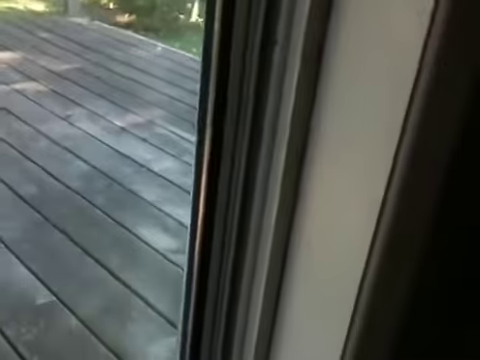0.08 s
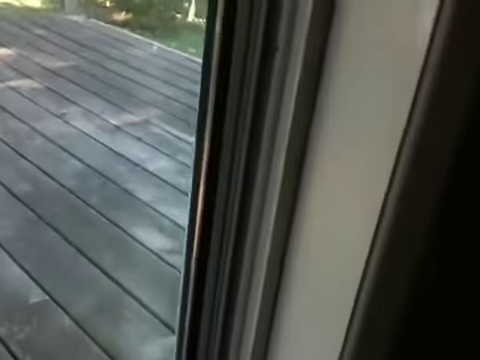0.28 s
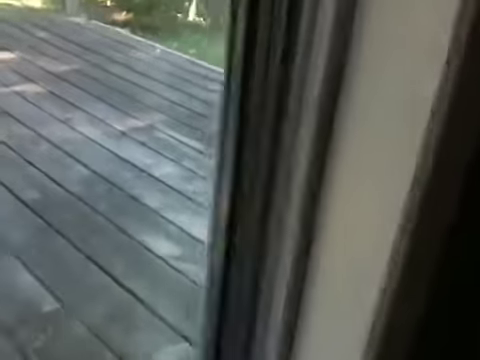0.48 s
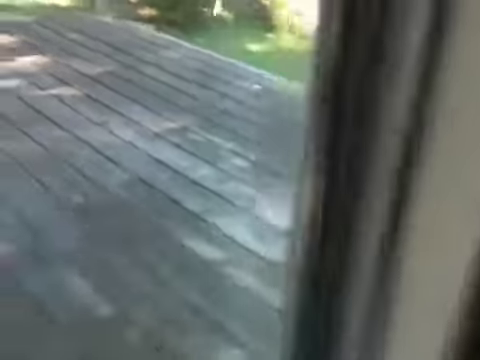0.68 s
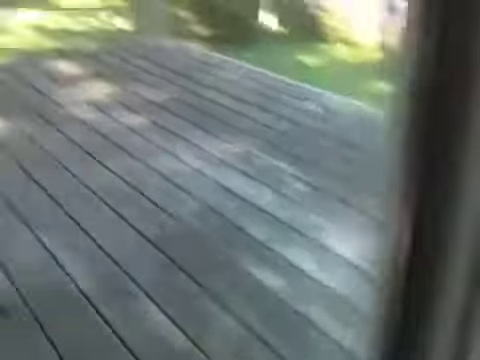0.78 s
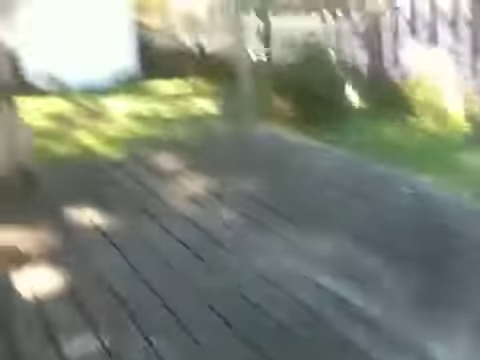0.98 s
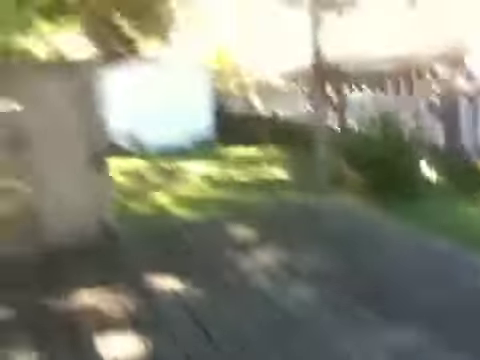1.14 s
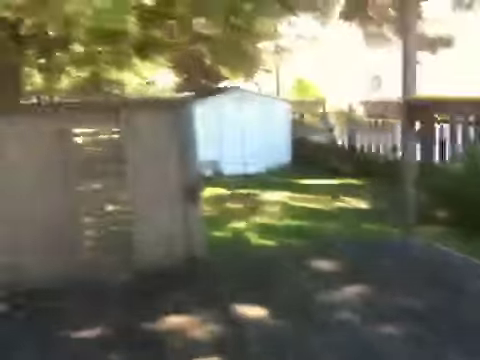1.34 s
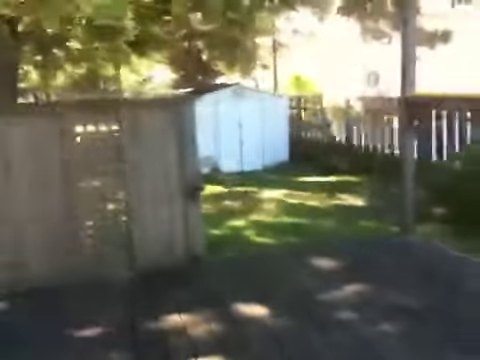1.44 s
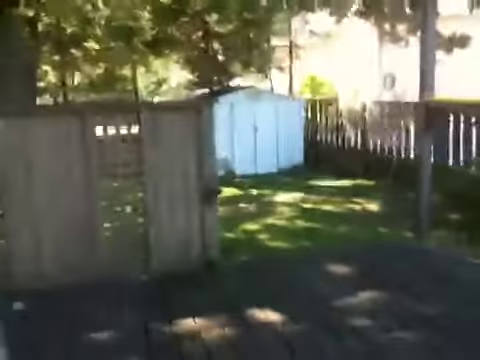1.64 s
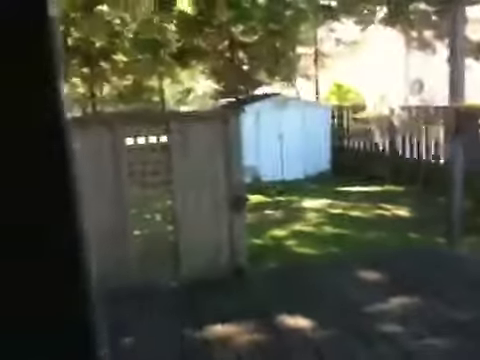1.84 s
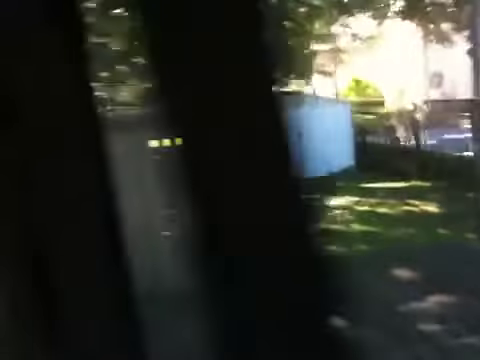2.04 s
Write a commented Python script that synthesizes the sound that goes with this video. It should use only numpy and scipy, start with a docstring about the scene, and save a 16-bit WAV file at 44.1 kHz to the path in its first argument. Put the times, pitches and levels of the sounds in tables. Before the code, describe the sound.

A sliding glass door is unlatched, heard close from indoors. A faint knock opens, then a hard, dry snap at 0.22 s with bolt chatter to 0.35 s and a light tap at 0.41. Metal handle clacks cluster at 0.75-0.97 s. Near quiet follows, with soft low pane thuds and tiny ticks over faint air hiss. At 1.82 s the door knocks free; rollers rumble, with low drone and grit growing from about 1.9 s to the end.

```python
"""A faint knock of a lock on its frame, then a hard snap: a sliding glass door is unlatched, heard from indoors.
The bolt chatters and the metal handle clacks in two clusters: noise cracks and rattles that ring damped modes.
The pulled pane thuds softly in single low resonances; rubs and small ticks are short bursts of band-limited noise.
The door lets go with a knock; its rollers rumble as bumps through door resonances, with a drone and grit hiss.
A faint hiss of air and a short room response lie around it."""
import sys
import numpy as np
from scipy import signal
from scipy.fft import rfft, irfft, next_fast_len
from scipy.io import wavfile
from scipy.ndimage import map_coordinates

SR = 44100
rng = np.random.default_rng(int(sys.argv[2]) if len(sys.argv) > 2 else 0)


def transcribe(u):
    """Save the signal u as a 16-bit wav file named by the first command-line argument.

    u: samples, shape (n,) or (channels, n), limited to [-1, 1]; the rate is SR.
    q: integer samples, one column per channel.
    """
    v = np.clip(np.atleast_2d(u).T, -1, 1)
    q = np.round(v * 32767).astype(np.int16)
    wavfile.write(sys.argv[1], SR, q)


N = 92610

# Contacts: (time [s], level [dB], brightness [dB/octave], glass shake [dB])
# lock on frame
KNOCKS = [(.0045, -30.5, 2, -4.5), (.092, -39.5, -3, 1), (.2249, -7.5, -0.5, -4.5), (.2385, -28, -3, 0),
          (.2565, -33, -9, -7), (.4085, -33, 1, -19.5), (1.951, -39.5, 2, -20), (1.992, -41, -5, -41)]
# bolt chatter, same columns: (time [s], level [dB], brightness [dB/octave], glass shake [dB])
CHATTER = [(.2916, -28, -1.5, -12), (.2975, -33, 4, -4), (.3035, -32, 0, 2), (.312, -37, -2.5, -3),
           (.3405, -47.5, 7, -8.5)]
# handle clacks, same columns: (time [s], level [dB], brightness [dB/octave], glass shake [dB])
CLACKS = [(.7512, -27, 7, 6.5), (.754, -24, 2.5, 2.5), (.7695, -34, -5, 12), (.79, -38.5, 6, -10),
          (.802, -42.5, -7.5, -3), (.8912, -29, 3.5, -9), (.904, -37.5, -8, -15), (.9225, -39, 5, 2),
          (.9695, -36.5, 1.5, 5), (2.045, -37.5, 0.5, -4)]
# door ticks on jamb, then leaves it: (time [s], level [dB], brightness [dB/octave], glass shake [dB])
RELEASE = [(.7045, -49.5, 9, -14), (1.717, -49.5, -5.5, 8), (1.8155, -32.5, 0.5, 2.5)]

# Damped modes: (frequency [Hz], level [dB], t60 [s])
# frame
FRAME_MODES = [(268, -28.5, .12), (467.4, -19.5, 0.11), (548.8, -28.5, 0.12), (1057, -22.5, 0.099),
               (1499, 3.5, 0.018), (1530, -23, 0.083), (1578, -23, 0.097), (2314, -24, .11),
               (3269, -24.5, 0.088)]
# bolt: (frequency [Hz], level [dB], t60 [s])
BOLT_MODES = [(450, -15, 0.14), (1715, -2.5, 0.039), (2478, 2.5, .03), (2645, -17, 0.05)]
# handle: (frequency [Hz], level [dB], t60 [s])
HANDLE_MODES = [(466.3, -22.5, 0.29), (821, -9, 0.045), (931, -14.5, 0.075), (1438, -9.5, 0.046),
                (1664, -6, 0.064), (2290, -2.5, 0.036), (2925, -31, 0.084), (3845, -10, 0.091),
                (3950, -12, 0.073), (6950, -12, 0.037)]
# jamb: (frequency [Hz], level [dB], t60 [s])
JAMB_MODES = [(300, -11.5, 0.15), (642.7, -15, 0.16), (980, -14, 0.15), (3000, -6, 0.018)]
# glass pane: (frequency [Hz], level [dB], t60 [s])
PANE_MODES = [(103, -15, 0.092), (172, -2.5, .12), (222.5, 0, 0.089), (276.2, -11.5, 0.047),
              (345, -15, .12)]

# Contact noise colours: (frequency [Hz], gain [dB])
# frame
FRAME_COLOUR = [(50, -28), (200, -12.5), (480, -7), (850, -12), (1550, 2.5), (2100, -5), (3200, -5),
                (6000, -11), (9500, -26), (16000, -42)]
# bolt: (frequency [Hz], gain [dB])
BOLT_COLOUR = [(90, -32), (250, 5.5), (700, 5.5), (2400, 1), (4500, -5), (7000, -10), (16000, -47)]
# handle: (frequency [Hz], gain [dB])
HANDLE_COLOUR = [(100, -39), (600, -2), (1150, -5.5), (1700, -1), (4000, 2), (7000, 0), (10000, -18),
                 (16000, -27)]
# jamb: (frequency [Hz], gain [dB])
JAMB_COLOUR = [(80, -14), (400, -1), (1300, 7.5), (3200, 6), (5000, -8), (7000, -5), (10000, -43),
               (16000, -50)]

# pane thuds under the hand: (time [s], level [dB], pitch [Hz], t60 [s])
THUDS = [(0.145, -53.5, 285.4, 0.14), (0.303, -38, 202, 0.11), (0.352, -39.5, 235, 0.14),
         (.635, -55, 596, 0.18), (0.754, -45, 194, 0.063), (.917, -45, 542, .12), (0.97, -44.5, 139, 0.16),
         (1.323, -46.5, 400.5, 0.16), (1.335, -48, 194.7, 0.16), (1.421, -48, 193, 0.127),
         (1.553, -55, 381.6, .16), (1.567, -48, 198, 0.13), (1.724, -42.5, 179, 0.14),
         (1.84, -41, 168, 0.1)]
# rubs and small ticks: (middle [s], half length [s], level [dB], centre [Hz], width [octaves])
RUBS_AND_TICKS = [(0.137, 0.0018, -56, 7060, 0.87), (0.218, 0.0082, -52, 2260, 0.17),
                  (0.228, 0.0019, -19.5, 1494, 0.48), (0.34, 0.012, -47.5, 3460, 1.04),
                  (0.39, 0.014, -46.5, 4300, 1.44), (0.408, 0.005, -37.5, 2240, 1.88),
                  (0.562, 0.0068, -51, 5830, 0.84), (0.632, 0.01, -58.5, 3580, 2.24),
                  (1.004, 0.038, -58, 1730, 3.04), (1.396, 0.0017, -53.5, 2080, .9),
                  (1.677, .001, -58.5, 2100, 0.26), (1.976, 0.0074, -53.5, 2540, 1)]
# door speed as a level: (time [s], speed [dB])
SPEED = [(1.782, -100), (1.831, -35), (1.9, -24), (1.97, -18), (2.019, -11), (2.048, -1.5), (2.1, 3.5)]
# rolling door resonances: (centre [Hz], bandwidth [Hz], level [dB])
ROLL_MODES = [(110, 30, -12.5), (174, 38, -3.5), (229, 34, -2), (330, 23, -2.5), (580, 360, -18.5),
              (930, 110, -16), (1560, 290, -18)]
# grit hiss colour: (frequency [Hz], gain [dB])
GRIT_COLOUR = [(300, -15), (1400, 2), (3000, 1), (7000, 0.5), (10000, -15.5), (16000, -21)]
# air hiss colour: (frequency [Hz], gain [dB])
AIR_COLOUR = [(30, -20.5), (130, -6.5), (260, 3), (570, -9.5), (1600, -8), (3400, -8), (5600, -6.5),
              (10000, -15.5), (16000, -22.5)]
# room decay: (frequency [Hz], t60 [s])
ROOM_T60 = [(150, 0.76), (1500, 0.38), (6000, 0.23), (14000, .22)]

PANE_DB, PANE_ATTACK_S = -20.5, 0.0022
RATTLE_PER_S = 1400
RING_DB_PER_DB = 0.14  # extra ring per dB of blow
RING_WAVER_RAD, RING_BEAT_DB = 0.65, 2  # waver at 1500 Hz
THUD_RISE_S, THUD_WAVER_RAD, THUD_BEAT_DB = 0.01, 0.6, 2
THUD_NOISE_DB, THUD_NOISE_HZ = -10, 450
ROLL_DB, BUMPS_PER_S = -44, 900
DRONE_HZ, DRONE_DB, DRONE_DB_PER_DB = 214, -42.5, 1.7  # slope per dB of speed
GRIT_DB, GRIT_DB_PER_DB = -52.5, 0.26
AIR_DB = -65.5
ROOM_DB, EARLY_DB, EARLY_T60_S, WALL_S = -15.5, -16, 0.073, 0.006
LOW_CUT_HZ, TOP_HZ = 60, 15950


def amp(db):
    """Decibels to gain."""
    return 10 ** (np.asarray(db) / 20)


def unit(x):
    """Scale to rms 1."""
    return x / np.sqrt(np.mean(x ** 2) + 1e-20)


def along(points, hz):
    """Interpolate (frequency, value) points on a log axis."""
    f, v = np.transpose(points)
    return np.interp(np.log(hz + 1), np.log(f + 1), v)


def filtered(x, response):
    """Multiply the spectrum of x by a function of frequency."""
    m = next_fast_len(len(x) + SR // 4)
    return irfft(rfft(x, m) * response(np.fft.rfftfreq(m, 1 / SR)), m)[:len(x)]


def causal(gain_db, size=2048):
    """Minimum-phase impulse response of energy 1 with the given colour."""
    cepstrum = irfft(np.log(amp(gain_db(np.fft.rfftfreq(size, 1 / SR))) + 1e-6))
    cepstrum[1:size // 2] *= 2
    cepstrum[size // 2 + 1:] = 0
    h = irfft(np.exp(rfft(cepstrum)))
    return h / np.linalg.norm(h)


def wobble(rate, size):
    """Smooth random curve, rate knots a second."""
    knots = rng.standard_normal(int(size * rate / SR) + 4)
    return map_coordinates(knots, [np.arange(size) * rate / SR])


def add(out, s, x):
    """Mix x into out from time s."""
    i = max(round(s * SR), 0)
    out[i:i + len(x)] += x[:max(len(out) - i, 0)]


def fade(t, t60):
    """Exponential decay, 60 dB in t60."""
    return np.exp(-np.log(1000) * t / t60)


def grains(rate):
    """Tiny random impacts, rate a second on average, at rms 1."""
    return unit(rng.standard_normal(N) * (rng.random(N) < rate / SR))


def lock():
    """Hard contacts of lock, bolt, handle and jamb, each ringing its own modes."""
    knocks = blows(KNOCKS, FRAME_MODES, FRAME_COLOUR, crack_db=-4.5, crack_t60=0.033, ring_db=-1.0,
                   rise_s=0.00023, rattle_db=-23.0, rattle_t60=0.16)
    chatter = blows(CHATTER, BOLT_MODES, BOLT_COLOUR, crack_db=-3.0, crack_t60=0.03, ring_db=2.0,
                    rise_s=0.00025, rattle_db=-14.5, rattle_t60=0.25)
    clacks = blows(CLACKS, HANDLE_MODES, HANDLE_COLOUR, crack_db=-1, crack_t60=0.034, ring_db=-3.0,
                   rise_s=0.00068, rattle_db=-18.5, rattle_t60=0.25)
    release = blows(RELEASE, JAMB_MODES, JAMB_COLOUR, crack_db=0.5, crack_t60=0.033, ring_db=-1,
                    rise_s=0.00076, rattle_db=-10.5, rattle_t60=0.055)
    return knocks + chatter + clacks + release


def blows(rows, modes, colour, crack_db, crack_t60, ring_db, rise_s, rattle_db, rattle_t60):
    """Each contact cracks, rattles loose parts, rings the struck part (light ones less) and shakes the glass."""
    out, t = np.zeros(N), np.arange(SR // 2) / SR
    hardest_db = max(row[1] for row in rows)
    for s, db, tilt, glass_db in rows:
        body = causal(lambda hz: along(colour, hz) + tilt * np.log2(1 + hz / 1500))
        crack = amp(crack_db) * rng.choice([-1, 1], len(t)) * fade(t, crack_t60)
        rattle = amp(rattle_db) * grains(RATTLE_PER_S)[:len(t)] * fade(t, rattle_t60)
        noise = signal.fftconvolve(crack + rattle, body)[:len(t)]
        ringing = amp(ring_db + RING_DB_PER_DB * (db - hardest_db)) * ring(modes, t, tilt)
        part = (noise + ringing) * (1 - np.exp(-t / rise_s))
        glass = ring(PANE_MODES, t) * (1 - np.exp(-t / PANE_ATTACK_S))
        add(out, s, amp(db) * (part + amp(PANE_DB + glass_db) * glass))
    return out


def ring(modes, t, tilt=0):
    """Damped modes beat in level and waver in phase, the high ones wavering most; tilt favours the high ones."""
    out = np.zeros(len(t))
    for k, (hz, db, t60) in enumerate(modes):
        level = amp(db + RING_BEAT_DB * wobble(80, len(t)) + tilt * np.log2(hz / 1500))
        waver = RING_WAVER_RAD * np.sqrt(hz / 1500) * wobble(150, len(t))
        out += (-1) ** k * level * fade(t, t60) * np.sin(2 * np.pi * hz * t + waver)
    return out


def rollers():
    """Track bumps drum on door resonances, a roller drone swells with speed, grit hisses under the wheels."""
    t = np.arange(N) / SR
    speed_db = np.interp(t, *np.transpose(SPEED), left=-120)

    def door(f):
        """Sum of band-pass resonances, alternating in sign."""
        return sum((-1) ** k * amp(db) * 1j * f * width / (centre ** 2 - f * f + 1j * f * width)
                   for k, (centre, width, db) in enumerate(ROLL_MODES))

    rumble = unit(filtered(grains(BUMPS_PER_S), door))
    drone = unit(np.sin(2 * np.pi * DRONE_HZ * t + 0.5 * wobble(60, N)))
    grit = unit(filtered(grains(3000), lambda hz: amp(along(GRIT_COLOUR, hz))))
    grit = grit * amp(1.6 * wobble(90, N))  # level flickers
    return (amp(ROLL_DB + speed_db) * rumble
            + amp(DRONE_DB + DRONE_DB_PER_DB * np.minimum(speed_db, 0)) * drone
            + amp(GRIT_DB + GRIT_DB_PER_DB * speed_db) * grit)


def thuds():
    """Soft pushes swell and die in one wavering resonance each, with dull contact noise."""
    out, t = np.zeros(N), np.arange(SR // 2) / SR
    for s, db, hz, t60 in THUDS:
        wave = np.sin(2 * np.pi * hz * t + THUD_WAVER_RAD * wobble(83, len(t)))
        wave = wave * amp(THUD_BEAT_DB * wobble(100, len(t)))
        contact = unit(filtered(rng.standard_normal(len(t)),
                                lambda f: (f * THUD_NOISE_HZ / (f ** 2 + THUD_NOISE_HZ ** 2)) ** 2))
        envelope = fade(t, t60) * (1 - np.exp(-t / THUD_RISE_S))
        add(out, s, amp(db) * (wave + amp(THUD_NOISE_DB) * contact) * envelope)
    return out


def rubs_and_ticks():
    """Rubs and small ticks: short Gaussian bursts of band-limited noise made of dense grains."""
    t, out = np.arange(N) / SR, np.zeros(N)
    for s, half_s, db, centre_hz, width in RUBS_AND_TICKS:
        noise = unit(filtered(grains(11000),
                              lambda hz: 1 / (1 + (np.log2((hz + 1) / centre_hz) / width) ** 2) ** 3.6))
        out += amp(db) * noise * np.exp(-0.5 * ((t - s) / half_s) ** 2)
    return out


def room(x):
    """Sparse early echoes and a tail decaying by frequency, both after the delay of the near walls."""
    hz, t, z = signal.stft(rng.standard_normal(SR // 2), SR, nperseg=256)
    tail = signal.istft(z * fade(t, along(ROOM_T60, hz)[:, None]), SR, nperseg=256)[1]
    t = np.arange(len(tail)) / SR
    early = rng.standard_normal(len(t)) * (rng.random(len(t)) < 1500 / SR) * fade(t, EARLY_T60_S)
    answer = amp(ROOM_DB) * tail / np.linalg.norm(tail) + amp(EARLY_DB) * early / np.linalg.norm(early)
    out = np.zeros(N)
    add(out, WALL_S, signal.fftconvolve(x, answer))
    return out


def air():
    """Faint coloured noise, its level wavering slightly."""
    hiss = unit(filtered(rng.standard_normal(N), lambda hz: amp(along(AIR_COLOUR, hz))))
    return amp(AIR_DB + 0.6 * wobble(9.3, N)) * hiss


def scene():
    """The door in its room, one channel."""
    door = lock() + rollers() + thuds() + rubs_and_ticks()
    return (door + room(door) + air())[None]


def record(dry):
    """The small microphone loses deep bass; a steep low-pass sets the band limit."""
    high_pass = signal.butter(2, LOW_CUT_HZ, "highpass", fs=SR, output="sos")
    thin = signal.sosfilt(high_pass, dry)
    return np.array([filtered(x, lambda hz: 1 / np.sqrt(1 + (hz / TOP_HZ) ** 240)) for x in thin])


dry = scene()
out = record(dry)
transcribe(out)
```